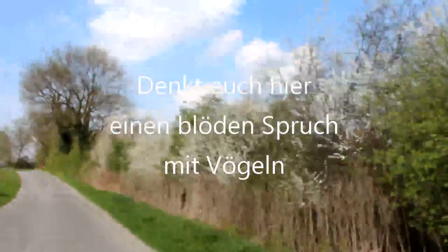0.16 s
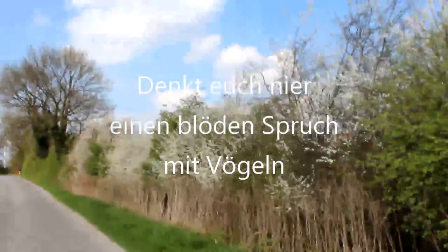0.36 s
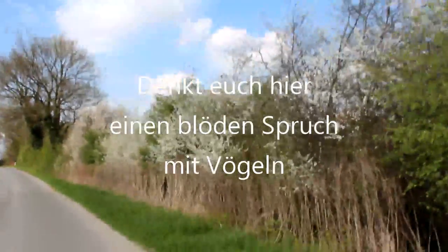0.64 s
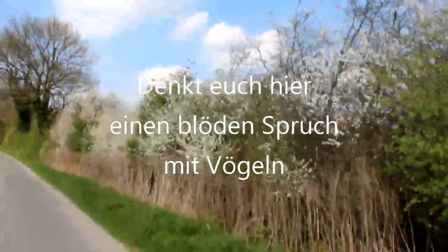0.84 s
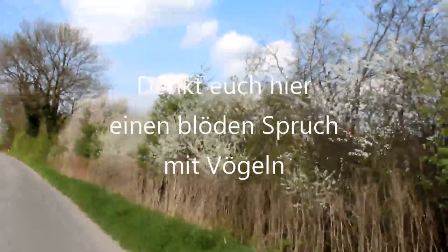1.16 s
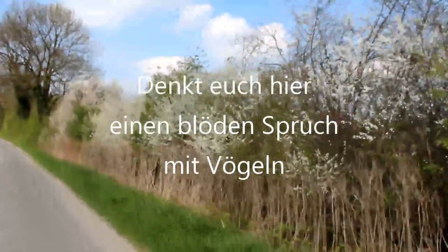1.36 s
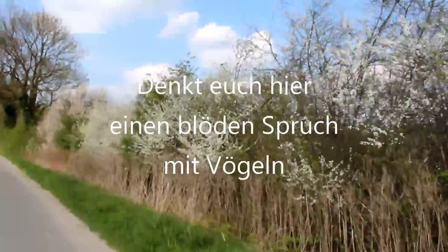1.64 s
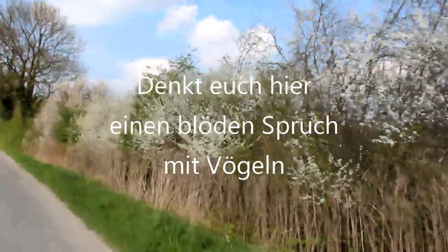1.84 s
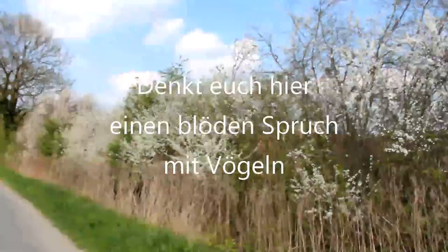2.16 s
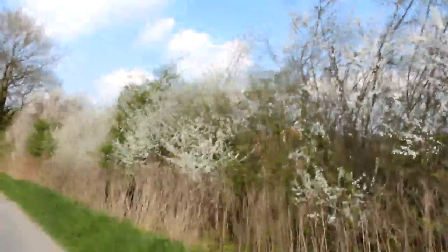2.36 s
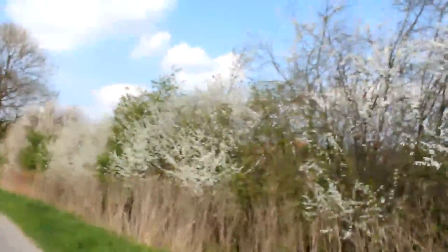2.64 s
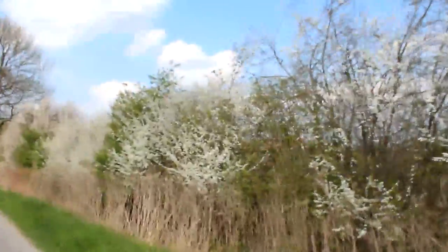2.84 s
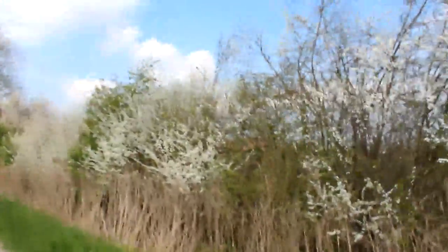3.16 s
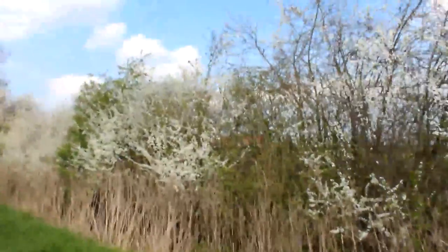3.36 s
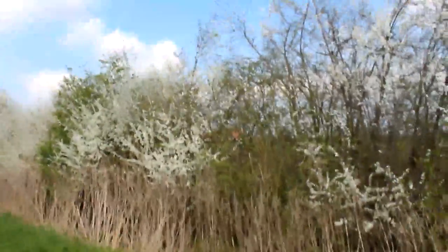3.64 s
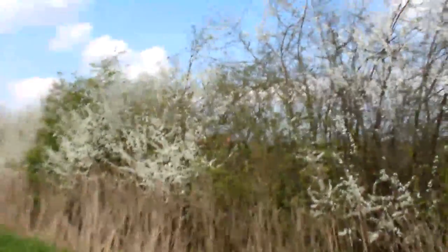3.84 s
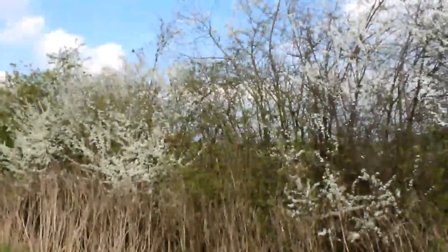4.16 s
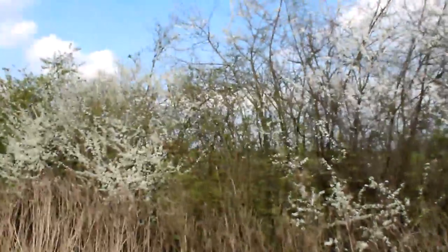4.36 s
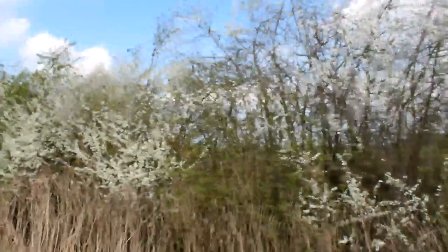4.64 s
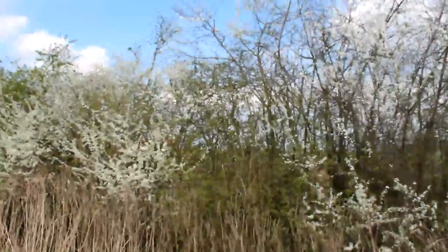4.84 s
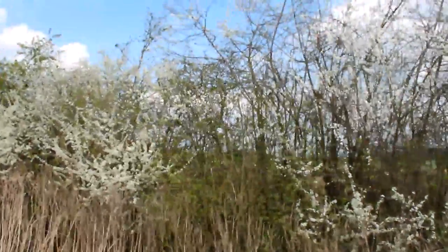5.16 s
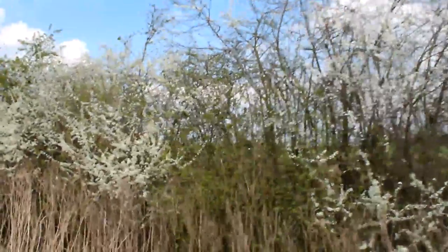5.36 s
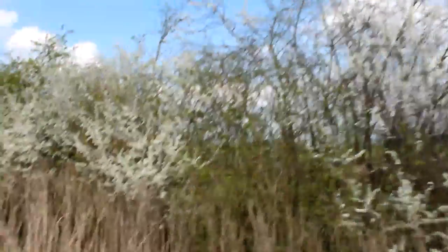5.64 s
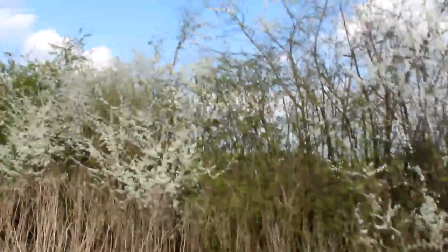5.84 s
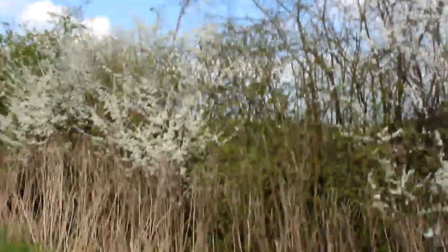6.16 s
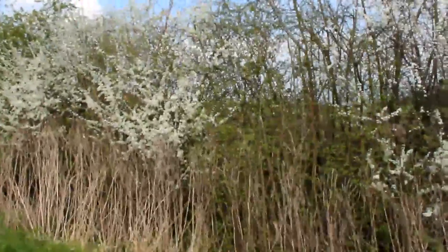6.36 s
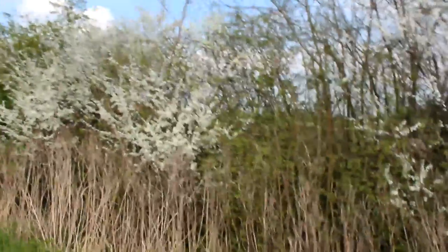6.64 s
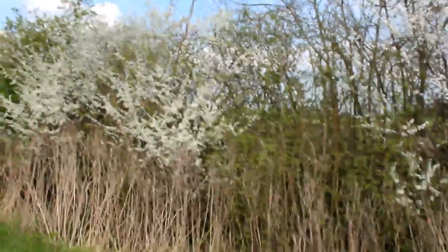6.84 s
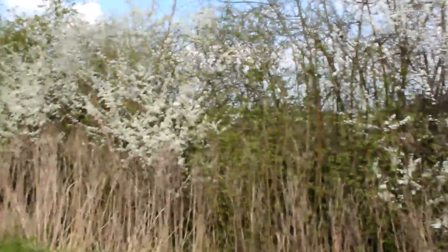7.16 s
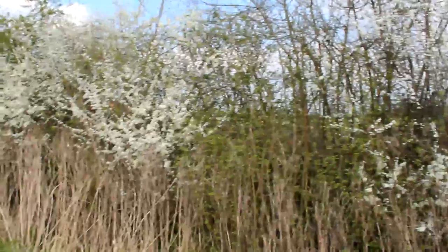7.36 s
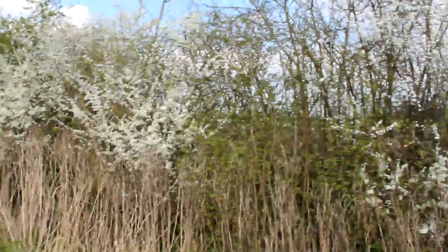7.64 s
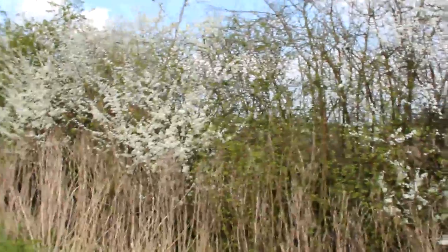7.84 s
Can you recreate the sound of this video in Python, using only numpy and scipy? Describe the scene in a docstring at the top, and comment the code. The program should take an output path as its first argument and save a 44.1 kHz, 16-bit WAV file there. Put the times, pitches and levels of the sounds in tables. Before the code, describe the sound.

In open countryside, sparrows chatter in a roadside hedge, heard through a handheld microphone. From 0 to 1.6 seconds, low wind buffeting thumps and rumbles beneath quick chirps, some with nasal, scratchy starts bending up into fast gliding whistles around 3 to 5 kHz. Chirps cluster near 0.9, 1.3 and 1.6 seconds, slightly hoarse and breathy, with trilling tails. A small hollow scuff falls at 2.0, with more gusts until 2.5, a strong one around 3.0 and a heavy thump at 3.9. From 4 seconds the wind fades and the chatter becomes denser and clearer, with rapid chirps at 4.1 to 4.8 and bright ones at 5.8. Fingers tick and scrape the case at 4.9, 5.2 and 6.0 to 6.3, with lighter touches later. Chirping continues to 8 seconds. Twigs give short scattered echoes; a soft, gently breathing air hush lies underneath throughout.

```python
"""Sparrows in a breezy hedge

Sparrows chirp and chatter in a roadside hedge: nasal starts lead into fast gliding whistles,
built from slightly hoarse sine tones with hissing breath, and twigs scatter them as echoes.
Gusts, mostly in the first half, are bumps of noise that make the microphone swing and thump.
Fingers tick, rustle and scuff on its case (noise bursts and sinking tones); soft noise is the country air."""
import sys
import numpy as np
from scipy import signal
from scipy.fft import rfft, irfft
from scipy.io import wavfile
from scipy.ndimage import uniform_filter1d

SR = 44100
rng = np.random.default_rng(int(sys.argv[2]) if len(sys.argv) > 2 else 0)


def wav_out(sig):
    """Save sig, one row per channel (or a flat mono array), as 16-bit PCM at SR to the path in sys.argv[1]."""
    wavfile.write(sys.argv[1], SR, np.round(np.clip(np.atleast_2d(sig).T, -1, 1) * 32767).astype(np.int16))


def voltage_ratio(decibels):
    """Convert decibels (scalar or array-like) to amplitude ratios, 20 dB per decade."""
    exponent = np.asarray(decibels, float) / 20
    return 10 ** exponent


N = 352888   # samples, about 8 s


def rms_one(x):
    """Scales x to an average strength (rms) of 1."""
    return x / np.sqrt(np.mean(x ** 2) + 1e-20)


def drift(rate_hz):
    """Slow chance: noise twice through a one-pole low-pass, spread 1."""
    r = np.exp(-2 * np.pi * rate_hz / SR)
    noise = rng.standard_normal(N + SR)
    settled = signal.lfilter([1], [1, -2 * r, r * r], noise)[SR:]
    return rms_one(settled)


def colour(x, spectrum):
    """Filters x by (f/Hz, gain/dB) points: level below the first, -80 dB above the last."""
    hz, db = np.transpose(spectrum)
    log_hz = np.log(np.arange(N // 2 + 1) * SR / N + 1)
    gain = voltage_ratio(np.interp(log_hz, np.log(hz), db, right=-80))
    return irfft(rfft(x) * gain, N)


def resonance(x, hz, width_hz):
    """Rings at one pitch: a two-pole peak of gain 1."""
    r = np.exp(-np.pi * width_hz / SR)
    feedback = [1, -2 * r * np.cos(2 * np.pi * hz / SR), r * r]
    return signal.lfilter([(1 - r * r) / 2, 0, (r * r - 1) / 2], feedback, x)


def swell(start_s, end_s, fade_s):
    """The samples a sound takes up, their times, and soft ends just outside it."""
    first = max(round((start_s - fade_s) * SR), 0)
    last = min(round((end_s + fade_s) * SR), N)
    span = np.arange(first, last)
    t = span / SR
    ends = np.clip(np.minimum(t - start_s, end_s - t) / fade_s + 1, 0, 1) ** 2
    return span, t, ends


def sparrows():
    """Nasal starts and whistles make the voice; breath hisses along, swelling less than the voice."""
    # airier chirps: start t/s, end t/s, extra breath level/dB
    airy_chirps = [(1.195, 1.464, 4), (5.18, 5.42, 4), (7.1, 7.32, 7), (7.47, 7.6, 4)]
    # colour of the hiss past the beak: f/Hz, relative level/dB per Hz
    breath_colour = [(2000, -92), (3500, 16.5), (6000, 0), (10000, -3), (16000, -9.5)]
    breath_db, flicker_db, follows = -27, 3.5, 0.74   # follows: power of the voice's strength

    voice = whistles() + nasal_starts()
    strength = uniform_filter1d(voice ** 2, size=2100).clip(0) ** .5
    effort = strength ** follows
    t = np.arange(N) / SR
    extra_db = sum(db * (t > start) * (t < end) for start, end, db in airy_chirps) * 1.
    extra_db = uniform_filter1d(extra_db, size=1500)
    hiss = rms_one(colour(rng.standard_normal(N), breath_colour))
    return voice + voltage_ratio(breath_db + extra_db + flicker_db * drift(11.0)) * effort * hiss


def whistles():
    """Gliding tones with warble, rasp and overtones; the second side of the syrinx trails, trilling."""
    # overtones: multiple of the pitch, level/dB
    overtone_levels = [(2, -28), (3, -37.5)]
    # where the voice trills as it trails off: start t/s, end t/s, depth as share of pitch
    trill_spans = [(0.985, 1.025, 0.11), (1.321, 1.378, 0.072), (1.851, 1.885, 0.071), (4.493, 4.517, 0.14),
                   (2.145, 2.18, 0.083), (3.12, 3.15, 0.072), (3.653, 3.7, 0.1), (5.865, 5.92, 0.074),
                   (6.9, 6.95, 0.1), (7.015, 7.06, 0.094)]
    warble, voice_trill_hz = 0.0138, 83.9   # warble: spread as share of pitch
    hoarse_db, rasp_db = 2.5, -15.5
    # second side: level, delay, pitch ratio to the first and how far that ratio wanders and trills
    second_db, second_flicker_db, lag_s = -12, 4.0, .014
    ratio, wander, trill, second_trill_hz = .97, .06, .02, 95

    song = np.zeros(N)
    now = np.arange(N) / SR
    waver = 1 + warble * drift(110)
    depths = sum(depth * (now > start) * (now < end) for start, end, depth in trill_spans)
    trilling = 1 + np.sin(2 * np.pi * voice_trill_hz * now) * depths
    flutter = voltage_ratio(hoarse_db * drift(120)) + voltage_ratio(rasp_db) * drift(500)   # rasp spreads noise around the tone
    apart = ratio + wander * drift(9.4) + trill * np.sin(2 * np.pi * second_trill_hz * now)
    second = voltage_ratio(second_db + second_flicker_db * drift(17.0))
    patches = voltage_ratio(3.5 * drift(7.2))   # overtones come and go

    for s, hz, db in syllables():
        span, t, ends = swell(s[0], s[-1], fade_s=.004)
        level = np.sqrt(2) * voltage_ratio(np.interp(t, s, db)) * ends
        own = (span + rng.integers(N)) % N      # each note wavers on its own
        pitch = uniform_filter1d(np.interp(t, s, hz), size=60, mode="nearest")
        note_trill = trilling[span] if min(hz) < 4410 else 1   # the highest notes stay free of it
        phase = np.cumsum(2 * np.pi * pitch * waver[own] * note_trill / SR)

        # overtones change less than the main tone, which the beak lifts near its resonance
        steady = np.sqrt(level * np.max(level)) * patches[own]
        steady *= np.clip(3800 / pitch, 1, 2) ** 1.27   # richer on low notes
        overtones = sum(voltage_ratio(o_db) * np.sin(k * phase) for k, o_db in overtone_levels)

        late_hz = np.interp(t - lag_s, s, hz) * apart[own]
        trailing = np.cumsum(2 * np.pi * late_hz / SR)
        late = np.interp(t - lag_s, t, level) * ends * second[own]
        late *= np.minimum(late_hz / 3000, 1) ** 2.0      # the open beak radiates low tones poorly
        song[span] += flutter[span] * (level * np.sin(phase) + steady * overtones + late * np.sin(trailing))
    return song


def syllables():
    """Lists every whistled note as its times, pitches and levels; the beak favours some pitches."""
    # pointed up-and-down strokes: top t/s, rise t/s, fall t/s, foot f/Hz, top f/Hz, level/dB before shape and beak
    stroke_rows = [(0.147, 0.033, 0.026, 2885, 4980, -32), (0.151, 0.034, 0.016, 2610, 3160, -46),
                   (0.208, 0.038, 0.012, 2810, 4540, -32), (0.209, 0.032, 0.014, 2600, 3650, -42),
                   (0.261, 0.031, 0.021, 2880, 4450, -34.5), (0.26, 0.018, 0.034, 2670, 3560, -31),
                   (0.311, 0.087, 0.011, 2970, 4800, -41), (0.353, 0.027, 0.014, 3260, 4680, -43.5),
                   (0.908, 0.019, 0.015, 3620, 5000, -28.5), (0.93, 0.0091, 0.011, 3100, 4890, -37),
                   (0.967, 0.017, 0.017, 2960, 4440, -30), (0.999, 0.016, 0.019, 2910, 4020, -36),
                   (1.254, 0.022, 0.008, 3590, 4960, -25.5), (1.276, 0.0074, 0.0067, 3340, 4990, -36.5),
                   (1.309, 0.024, 0.015, 2890, 4110, -29.5), (1.345, 0.023, 0.029, 2960, 3560, -38),
                   (2.097, 0.012, 0.017, 3400, 5000, -36.5), (2.111, 0.0049, 0.011, 3120, 4900, -39),
                   (2.135, 0.012, 0.029, 2880, 4016, -33.5), (2.163, 0.0062, 0.013, 2650, 3520, -34),
                   (2.217, 0.035, 0.05, 2815, 5400, -28.5), (2.309, 0.025, 0.019, 2770, 4690, -30.5),
                   (2.554, 0.032, 0.05, 2800, 5220, -28), (2.649, 0.032, 0.012, 2585, 4620, -24.5),
                   (2.923, 0.032, 0.032, 3080, 5000, -30.5), (2.926, 0.016, 0.015, 2670, 3520, -40),
                   (2.982, 0.031, 0.014, 3035, 4520, -30.5), (2.987, 0.028, 0.0091, 2900, 3760, -43),
                   (3.04, 0.041, 0.019, 3015, 4740, -35), (3.037, 0.026, 0.01, 2756, 3510, -32),
                   (3.116, 0.019, 0.026, 2610, 3430, -33), (3.754, 0.029, 0.011, 2900, 4670, -32.5),
                   (4.101, 0.005, 0.0057, 3090, 5020, -36), (4.134, 0.019, 0.016, 2750, 4450, -31.5),
                   (4.161, 0.01, 0.009, 2620, 3760, -32.5), (4.261, 0.014, 0.011, 2910, 4040, -30.5),
                   (4.304, 0.033, 0.0058, 2920, 4240, -26), (4.325, 0.017, 0.01, 2796, 3620, -32.5),
                   (4.409, 0.033, 0.02, 3790, 4800, -23.5), (4.472, 0.025, 0.012, 2900, 3720, -26.5),
                   (4.605, 0.0077, 0.0061, 3030, 4510, -29.5), (4.649, 0.039, 0.0079, 2766, 4180, -28.5),
                   (4.67, 0.0088, 0.0207, 2800, 3580, -32), (4.725, 0.034, 0.014, 3510, 5700, -27.5),
                   (4.754, 0.0099, 0.0075, 3370, 5300, -27.5), (5.794, 0.022, 0.013, 3450, 5150, -21),
                   (5.816, 0.01, 0.011, 3380, 4630, -26), (5.85, 0.025, 0.016, 2875, 4110, -23),
                   (5.88, 0.021, 0.038, 2670, 3480, -33.5), (6.345, 0.032, 0.0085, 2760, 4400, -35),
                   (6.511, 0.04, 0.044, 2705, 5260, -27.5), (6.594, 0.031, 0.025, 2504, 4370, -25),
                   (6.852, 0.02, 0.027, 3260, 5020, -31), (6.868, 0.011, 0.011, 3250, 4900, -26.5),
                   (6.891, 0.0076, 0.024, 3030, 3990, -23), (6.965, 0.015, 0.01, 3440, 5300, -30.5),
                   (6.976, 0.005, 0.014, 3010, 4800, -32), (7.005, 0.014, 0.026, 2960, 4060, -28),
                   (7.171, 0.04, 0.021, 3135, 5540, -29.5), (7.26, 0.042, 0.014, 2730, 4130, -30.5),
                   (7.348, 0.037, 0.0066, 2900, 4500, -32), (7.567, 0.0054, 0.0055, 2870, 4500, -23.5),
                   (7.971, 0.006, 0.0077, 2895, 4120, -27.5)]
    # rounded arches, same columns: top t/s, rise t/s, fall t/s, foot f/Hz, top f/Hz, level/dB before shape and beak
    arch_rows = [(0.455, 0.027, 0.021, 2540, 3550, -38.5), (0.458, 0.013, 0.013, 3240, 4100, -34.5),
                 (0.488, 0.015, 0.025, 2295, 2880, -34.5), (0.609, 0.029, 0.019, 2576, 3410, -44.5),
                 (0.681, 0.022, 0.029, 2590, 3564, -37), (0.68, 0.011, 0.015, 3380, 4140, -36.5),
                 (0.712, 0.0064, 0.033, 2280, 2800, -35), (1.091, 0.018, 0.027, 6100, 6500, -34.5),
                 (2.486, 0.026, 0.011, 2830, 3420, -39), (2.774, 0.065, 0.069, 2447, 3760, -38),
                 (3.064, 0.016, 0.032, 2910, 3740, -33.5), (3.342, 0.026, 0.037, 2730, 4470, -26.5),
                 (3.375, 0.012, 0.029, 5330, 6290, -24.5), (3.389, 0.013, 0.029, 2350, 3160, -29.5),
                 (3.612, 0.038, 0.027, 2630, 4520, -27), (3.656, 0.02, 0.035, 2437, 3105, -33.5),
                 (3.778, 0.017, 0.023, 2680, 3454, -33.5), (4.24, 0.016, 0.014, 3770, 4520, -29),
                 (4.586, 0.02, 0.011, 3610, 4600, -27.5), (4.925, 0.016, 0.032, 2930, 4150, -30.5),
                 (5.048, 0.022, 0.029, 2523, 3550, -32.5), (5.047, 0.015, 0.012, 3430, 4200, -39),
                 (5.078, 0.016, 0.038, 1986, 2850, -32.5), (5.336, 0.02, 0.019, 2610, 3644, -27.5),
                 (5.37, 0.013, 0.033, 2250, 2850, -30), (5.532, 0.014, 0.026, 2595, 3580, -25.5),
                 (5.532, 0.017, 0.017, 3200, 4090, -30.5), (5.563, 0.011, 0.041, 2214, 2866, -28.5),
                 (5.571, 0.01, 0.039, 3320, 4510, -32.5), (5.618, 0.027, 0.033, 2546, 3440, -36),
                 (5.866, 0.018, 0.032, 5140, 6300, -37), (6.265, 0.079, 0.034, 3066, 4295, -29.5),
                 (6.604, 0.017, 0.045, 2900, 4727, -36.5), (6.675, 0.023, 0.02, 1800, 2075, -46),
                 (6.675, 0.009, 0.019, 3630, 4210, -43), (7.283, 0.044, 0.017, 3690, 5850, -32.5),
                 (7.531, 0.011, 0.043, 3060, 4190, -28), (7.67, 0.065, 0.02, 4730, 6850, -46),
                 (7.659, 0.026, 0.034, 2785, 3350, -35.5), (7.933, 0.01, 0.059, 3020, 4080, -29.5)]
    # straight slurs: start t/s, length t/s, from f/Hz, to f/Hz, level/dB in the middle
    slur_rows = [(0.916, 0.017, 4150, 3860, -31), (1.03, 0.041, 6040, 5950, -52),
                 (1.112, 0.06, 6260, 6730, -53), (1.115, 0.027, 5650, 5920, -42.5),
                 (1.264, 0.01, 4080, 3835, -24), (1.39, 0.017, 4900, 5220, -36),
                 (1.607, 0.06, 3860, 4230, -32.5), (1.6, 0.027, 3230, 3390, -35.5),
                 (1.632, 0.054, 3700, 4284, -25), (1.822, 0.031, 4600, 6000, -38),
                 (1.844, 0.05, 3750, 4096, -27.5), (1.881, 0.067, 2920, 2970, -32.5),
                 (1.926, 0.052, 2550, 2060, -43), (2.392, 0.012, 3350, 5370, -39),
                 (2.398, 0.05, 5030, 4140, -37), (2.434, 0.02, 3430, 2720, -36.5),
                 (3.426, 0.085, 5170, 5590, -41), (4.42, 0.023, 3540, 3260, -29),
                 (4.429, 0.043, 1384, 1310, -56), (4.487, 0.026, 3210, 2300, -42),
                 (4.759, 0.015, 3340, 4760, -23), (4.767, 0.08, 5380, 5000, -33.5),
                 (4.772, 0.044, 4960, 4780, -28), (4.95, 0.058, 3150, 2524, -32.5),
                 (5.294, 0.074, 3830, 4350, -26.5), (5.801, 0.0107, 3930, 3800, -20.5),
                 (5.93, 0.04, 5120, 5360, -28), (6.176, 0.036, 3330, 3315, -31.5),
                 (6.193, 0.042, 4090, 4270, -27), (6.237, 0.043, 4600, 5040, -34),
                 (6.648, 0.044, 3050, 2490, -40.5), (6.912, 0.043, 3430, 2150, -32.5),
                 (7.016, 0.036, 3280, 2460, -36), (7.182, 0.016, 8070, 6070, -39),
                 (7.575, 0.036, 4410, 3500, -26), (7.576, 0.036, 2740, 3150, -27),
                 (7.613, 0.029, 3690, 2830, -28), (7.985, 0.027, 2750, 2830, -31.5)]
    # loudness by pitch in the beak: f/Hz, gain/dB
    beak_gain = [(2000, 1.5), (2800, -1), (3500, 5.5), (4200, 3), (4800, 6), (5500, -2), (6600, -17)]
    # a call climbs, flicks up to a spike, slides down: t/s from the spike, f/Hz before scaling, relative level/dB
    call_shape = [(-0.055, 3550, -18), (-0.035, 4097, -0.5), (-0.005, 4987, -3), (0.0, 5850, -7),
                  (0.006, 4300, 1.5), (0.031, 3784, 0), (0.041, 3260, -10)]
    # such calls: spike t/s, pace (1 = as in the shape, more is slower), pitch factor, climb level/dB, slide level/dB
    spiked_calls = [(1.421, 0.92, 1.07, -39, -45), (1.559, 1.24, 0.99, -27, -24),
                    (1.779, 1.11, 1.004, -30.5, -31), (4.071, 0.99, 0.9, -38.5, -45),
                    (5.244, 1.1, 1.01, -28.5, -28.5), (6.143, 1.17, 0.98, -24, -22)]
    spike_s = .006   # half width of the spike, the same at any pace

    u = np.linspace(-1, 1, num=21)   # foot, top at 0, foot
    # softer at the foot, uneven between the flanks, thin at the turn
    stroke_db = -9.5 * u ** 2 + 1.5 * u - 6.5 * (1 - abs(u)) ** 3
    arch_db = -10.5 * u ** 2
    beak_hz, beak_db = np.transpose(beak_gain)
    notes = []
    # bend: power of the rising and falling flank, 1 a tent, 2 a parabola
    for rows, bend, shape_db in ((stroke_rows, (1.4, 0.63), stroke_db), (arch_rows, (2.2, 1.5), arch_db)):
        for at, rise, fall, foot_hz, top_hz, db in rows:
            times = at + u * np.where(u < 0, rise, fall)
            hz = top_hz - (top_hz - foot_hz) * abs(u) ** np.where(u < 0, *bend)
            notes.append((times, hz, db + shape_db + np.interp(hz, beak_hz, beak_db)))

    share = (u + 1) / 2
    for start, length, from_hz, to_hz, db in slur_rows:
        notes.append((start + length * share, from_hz + (to_hz - from_hz) * share, db - 7 * u ** 2))

    s, hz, db = np.transpose(call_shape)
    for at, pace, factor, climb_db, slide_db in spiked_calls:
        times = at + pace * s + (1 - pace) * np.clip(s, -spike_s, spike_s)
        notes.append((times, factor * hz, db + np.where(s > 0, slide_db, climb_db)))
    return notes


def nasal_starts():
    """Two low, scratchy voices whose overtones pass the throat, bending up into the whistle."""
    # lead-ins: start t/s, end t/s, upper side f/Hz before its bend, level/dB, lower side level/dB against the upper
    lead_ins = [(0.091, 0.136, 2570, -42, -8), (0.421, 0.438, 2270, -38, 0), (0.573, 0.59, 2200, -50, 1),
                (0.639, 0.673, 2374, -40.5, -0.5), (0.868, 0.884, 2200, -38, -14),
                (1.207, 1.22, 2276, -47, 6), (2.495, 2.533, 2680, -41, -8), (2.87, 2.899, 2600, -40, 0),
                (3.293, 3.309, 2120, -35.5, -18), (3.556, 3.576, 2404, -41.5, 6),
                (4.878, 4.913, 2226, -41.5, -1), (5.488, 5.507, 2370, -42.5, 11),
                (5.741, 5.767, 2256, -37, 3), (6.449, 6.5, 2780, -42, -4), (6.815, 6.844, 2850, -45, 0),
                (7.495, 7.516, 2260, -43.5, 0), (7.894, 7.925, 2230, -40.5, 2)]
    # the throat's filter: f/Hz, gain/dB
    throat_gain = [(1000, -43), (2400, -12), (4000, 0.5), (5500, 6), (6400, 0), (12000, -12)]
    lower_side = 0.83   # pitch ratio of the lower side
    rise, rise_power = 0.24, 2.4   # share of pitch gained by the end, curve of that rise
    upper_db, uneven_db = -19, 5.0   # overtones above the second are weaker; chance spread of all five

    song = np.zeros(N)
    unsteady = 1 + 0.0193 * drift(67)
    scratch = 1 + 0.34 * drift(470)
    throat_hz, throat_db = np.transpose(throat_gain)
    multiples = np.arange(1, 6)[:, None]
    for start, end, hz, db, lower_db in lead_ins:
        span, t, ends = swell(start, end, fade_s=0.014)
        bend = 1 + rise * np.clip((t - start) / (end - start), 0, None) ** rise_power
        for ratio, side_db in ((1, 0), (lower_side, lower_db)):
            pitch = ratio * hz * bend * unsteady[span]
            gains_db = np.interp(multiples * pitch, throat_hz, throat_db) + upper_db * (multiples > 2)
            gains = voltage_ratio(gains_db + uneven_db * rng.standard_normal((5, 1)))
            phase = np.cumsum(2 * np.pi * pitch / SR)
            buzz = np.sum(gains * np.sin(multiples * phase), axis=0)
            song[span] += voltage_ratio(db + side_db) * ends * scratch[span] * rms_one(buzz)
    return song


def hedge(x):
    """Twigs scatter densely within milliseconds, trees further off give a faint tail."""
    early_db, early_t60_s = -8, 0.094   # t60: time to fade by 60 dB
    far_db, far_t60_s = -24, 0.55
    t = np.arange(SR // 2) / SR
    scatter = rng.standard_normal((2, len(t))) * (t > .002)
    early = scatter[0] * voltage_ratio(-60 * t / early_t60_s)
    far = scatter[1] * voltage_ratio(-60 * t / far_t60_s)
    echo = voltage_ratio(early_db) * early / np.linalg.norm(early) + voltage_ratio(far_db) * far / np.linalg.norm(far)
    return x + signal.fftconvolve(x, echo)[:N]


def wind():
    """Eddies bump the capsule one by one and set it swinging for a cycle or two, over a steadier rumble."""
    # gusts on the microphone: peak t/s, rise t/s, fall t/s, peak level/dB before smoothing
    gust_rows = [(0.15, 0.36, 1.07, -28.5), (0.74, 0.12, 0.073, -30.5), (1.04, 0.16, 0.15, -31.5),
                 (1.358, 0.02, 0.025, -29.5), (1.55, 0.092, .2, -31.5), (2.4, 0.26, 0.37, -32.5),
                 (3.0, 0.14, 0.31, -25.5), (3.5, 0.16, 0.26, -32.5), (3.95, 0.22, 0.22, -30.5),
                 (6.15, 0.57, 0.97, -48.5)]
    # colour of the wind: f/Hz, relative level/dB per Hz
    wind_colour = [(12, -45), (20, 2.5), (75, 6.5), (166, -3), (468, -21.5), (900, -44), (1170, -65),
                   (1980, -120)]
    eddies_per_s, spread_db, rumble_db = 60, 5.0, -11
    drop_db = 20   # each gust changes by this much over its rise and fall

    t = np.arange(N) / SR
    gusts = sum(voltage_ratio(db - drop_db * np.maximum((at - t) / rise, (t - at) / fall))
                for at, rise, fall, db in gust_rows)
    level = uniform_filter1d(gusts, size=800)
    hits = rng.random(N) < eddies_per_s / SR
    bumps = hits * voltage_ratio(spread_db * rng.standard_normal(N)) * rng.choice([-1, 1], N)
    swings = rms_one(colour(resonance(bumps, 140, 390), wind_colour))
    rumble = rms_one(colour(rng.standard_normal(N), wind_colour))
    return level * (swings + voltage_ratio(rumble_db) * rumble)


def thumps():
    """Each strong eddy or shift of the hand swings the capsule once or twice."""
    # the strongest eddies: t/s, level/dB of the swell's crest
    strong_eddies = [(0.054, -18), (0.087, -21), (0.106, -12.5), (0.131, -25), (0.172, -18.5), (0.248, -24),
                     (0.325, -18), (0.357, -21), (0.374, -22), (0.45, -19.5), (0.703, -17), (0.738, -18),
                     (0.828, -21), (1.031, -22), (1.084, -17), (1.563, -19), (2.117, -15.5), (2.18, -19),
                     (2.313, -20.5), (2.436, -21.5), (2.928, -22), (2.962, -18.5), (2.985, -17),
                     (3.008, -22), (3.038, -24), (3.075, -19), (3.533, -22), (3.883, -11), (3.902, -18),
                     (3.963, -24), (3.982, -22), (4.01, -20.5), (4.027, -22)]
    # the hand shifts on the case: t/s, level/dB of the swell's crest, swing f/Hz
    hand_shifts = [(5.212, -30, 190), (5.945, -38.5, 65), (6.068, -32, 101), (6.105, -27.5, 75),
                   (6.138, -38, 90)]
    eddy_hz, spread_octaves, width_cycles = 138, .35, .44   # usual swing, its spread, width of the swell

    out = np.zeros(N)
    size, turn = rng.standard_normal((len(strong_eddies) + len(hand_shifts), 2)).T
    eddies = [(at, db, eddy_hz * 2 ** (spread_octaves * k)) for (at, db), k in zip(strong_eddies, size)]
    for (at, db, hz), phase in zip(eddies + hand_shifts, turn):
        span, t, _ = swell(at, at, fade_s=2 / hz)
        cycles = hz * (t - at)
        shape = np.exp(-.5 * (cycles / width_cycles) ** 2)
        out[span] += voltage_ratio(db) * shape * np.cos(2 * np.pi * (cycles + phase))
    return out


def handling():
    """Each touch is a burst of uneven grains that rings the case; long ones are a smoother rustle."""
    # fingers on the case: start t/s, relative level/dB, length t/s (1 ms at least), extra treble level/dB
    touches = [(0.531, -53, 0.007, 1), (2.688, -54, 0.00092, 10), (3.992, -42, 0.026, 21),
               (4.89, -50, 0.0083, -14), (5.21, -39, 0.013, -4), (6.016, -46.5, 0.046, -20),
               (6.076, -42, 0.057, -25), (6.226, -39, 0.011, -12), (6.288, -50.5, 0.0031, -12),
               (7.164, -43, 0.013, -14), (7.372, -65, 0.001, 8.5), (7.79, -49.5, 0.0064, 8)]
    # resonances of the case: f/Hz, width f/Hz, gain/dB
    case_peaks = [(230, 215, 14.5), (790, 2000, -2.5), (1640, 550, 1), (9000, 11000, -38)]
    grain_db, level_db, smooth_s = 12.0, 14, 0.023   # spread of the grains, overall gain, length that evens them

    touch = np.full((2, N), 1e-18)      # what rings the body of the case, and what hisses above it
    t = np.arange(SR // 6) / SR
    for at, db, length, treble_db in touches:
        spread_db = grain_db * np.exp(-length / smooth_s)
        grains = rng.standard_normal(len(t)) * voltage_ratio(spread_db * rng.standard_normal(len(t)))
        start = round(at * SR)
        age = 2 * t / max(length, .001)
        gains = voltage_ratio(db + level_db + np.array([[0], [treble_db]]))
        touch[:, start:start + len(t)] += gains * grains * np.sqrt(age) * np.exp(-age)
    # peaks above 4410 Hz take the hiss
    return sum(voltage_ratio(db) * resonance(touch[int(hz > 4410)], hz, width_hz) for hz, width_hz, db in case_peaks)


def scuffs():
    """A finger drags over the case: a sinking tone, roughened by slow noise, sounds like a hollow scrape."""
    # hollow scuffs: start t/s, length t/s, from f/Hz, to f/Hz, level/dB before the noise and the sine
    scuff_rows = [(2.032, 0.055, 680, 480, -41), (6.09, 0.04, 720, 480, -37.5),
                  (4.888, 0.0472, 1059, 640, -37.5), (6.011, 0.0487, 1000, 844, -38)]
    out, rough = np.zeros(N), drift(230)
    for start, length, from_hz, to_hz, db in scuff_rows:
        span, t, ends = swell(start, start + length, fade_s=0.00397)
        pitch = np.interp(t, [start, start + length], [from_hz, to_hz])
        tone = np.sin(np.cumsum(2 * np.pi * pitch / SR))
        out[span] += voltage_ratio(db) * ends * rough[span] * tone
    return out


def air():
    """Leaves, far fields and roads as a gently breathing hush of coloured noise."""
    # colour of the hush: f/Hz, relative level/dB per Hz
    air_colour = [(15, -33), (25, 1.5), (60, 4.5), (86, 4), (160, -2), (667, -4), (2010, -12), (3940, -10),
                  (5450, -18), (15600, -26.5)]
    # course of the hush: t/s, level/dB before its slow wandering
    hush_level = [(0.0, -48.5), (1.8, -50), (3.8, -47), (4.8, -47.5), (7.2, -50), (8.0, -45.5)]
    level_db = np.interp(np.arange(N) / SR, *np.transpose(hush_level))
    hush = rms_one(colour(rng.standard_normal(N), air_colour))
    return voltage_ratio(level_db + 1.3 * drift(0.78)) * hush


def scene():
    """Everything reaches one microphone."""
    birds = hedge(sparrows())
    return (birds + wind() + thumps() + handling() + scuffs() + air())[None]


def top_cut(x):
    """Nothing passes above the cut-off."""
    return signal.sosfilt(signal.butter(12, 15720, fs=SR, output="sos"), x)


def record(dry):
    """Passes on the finished mix."""
    return top_cut(dry)


dry = scene()
out = record(dry)
wav_out(out)
```